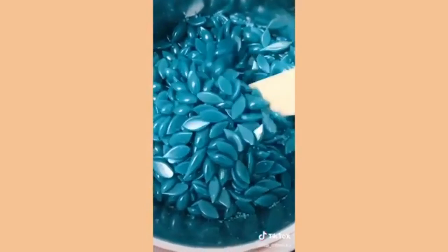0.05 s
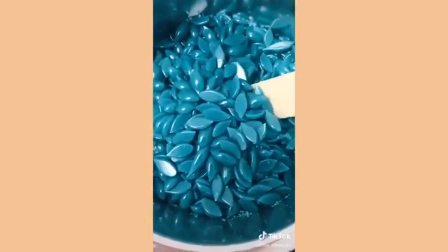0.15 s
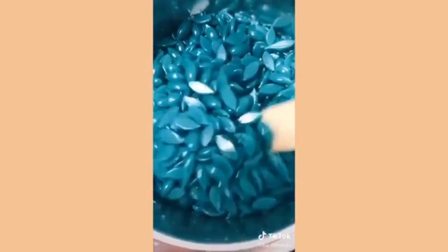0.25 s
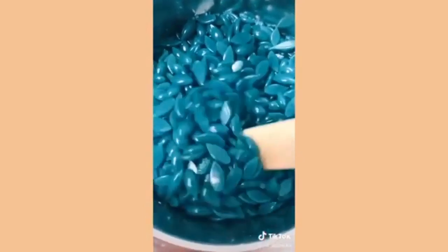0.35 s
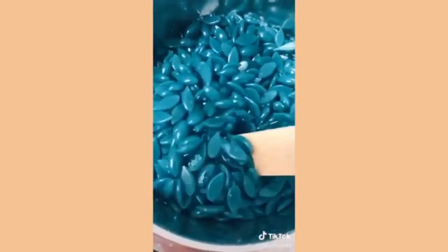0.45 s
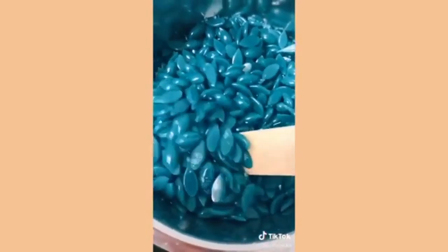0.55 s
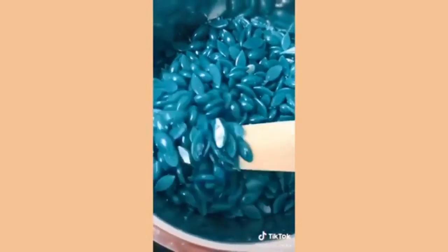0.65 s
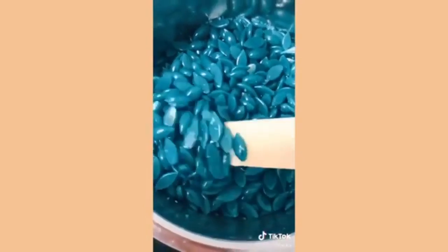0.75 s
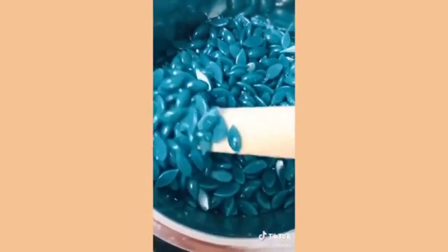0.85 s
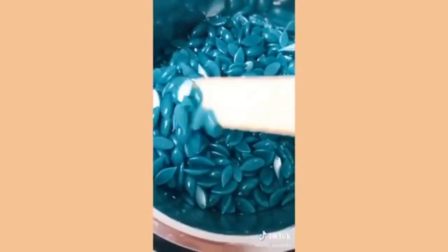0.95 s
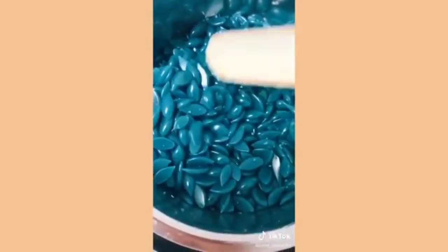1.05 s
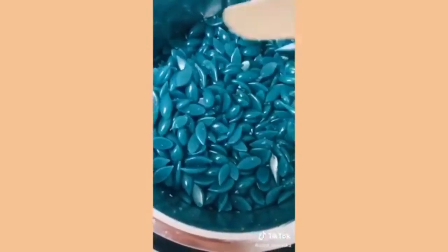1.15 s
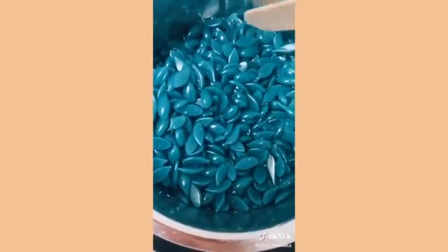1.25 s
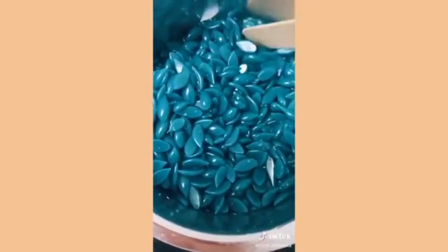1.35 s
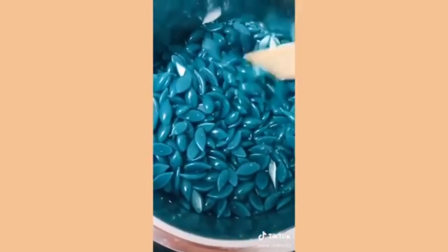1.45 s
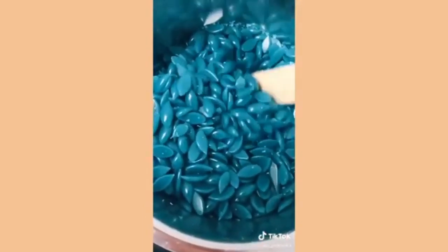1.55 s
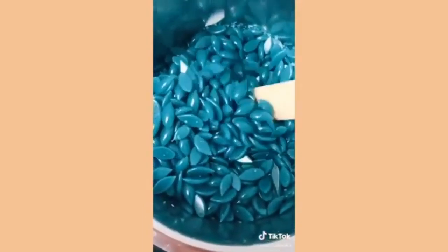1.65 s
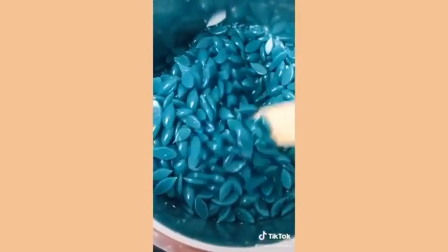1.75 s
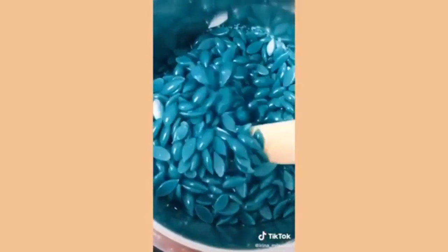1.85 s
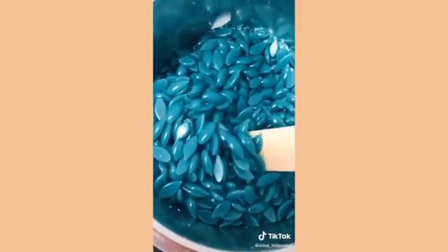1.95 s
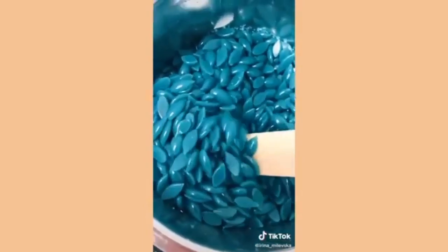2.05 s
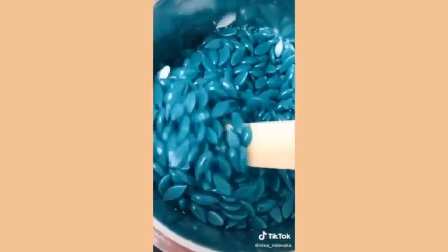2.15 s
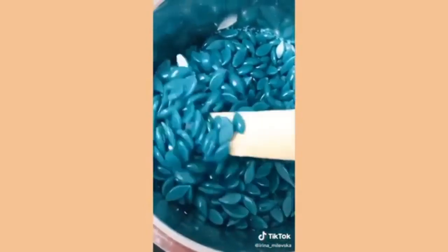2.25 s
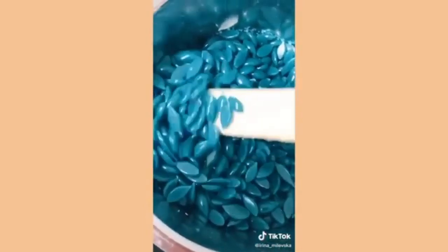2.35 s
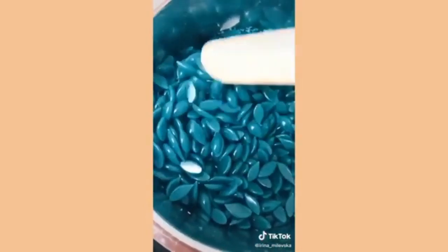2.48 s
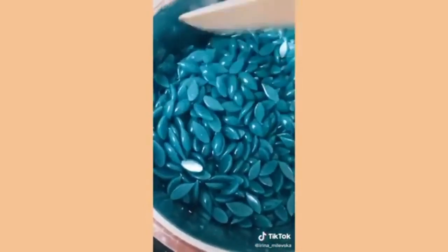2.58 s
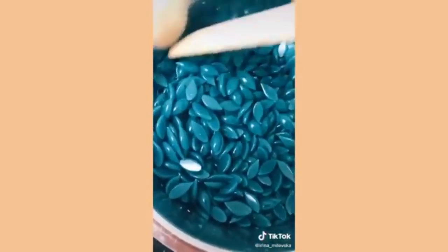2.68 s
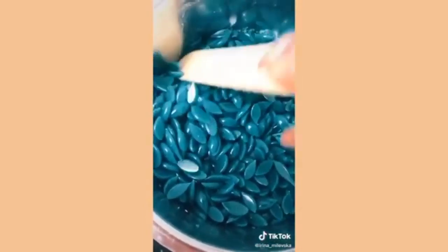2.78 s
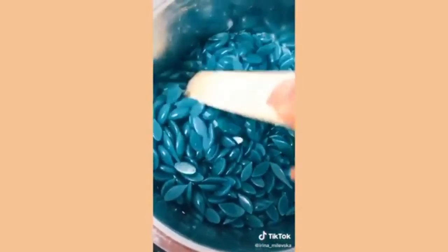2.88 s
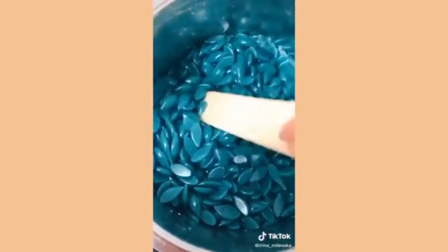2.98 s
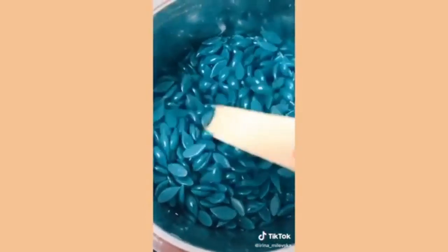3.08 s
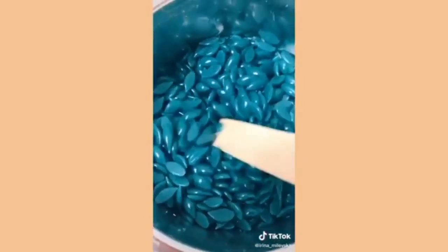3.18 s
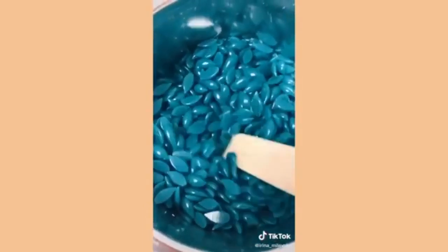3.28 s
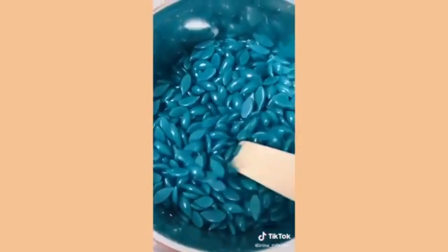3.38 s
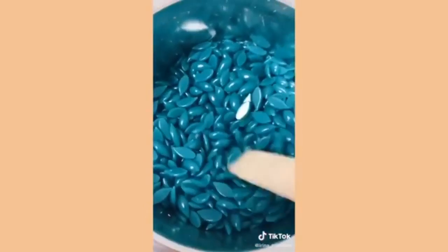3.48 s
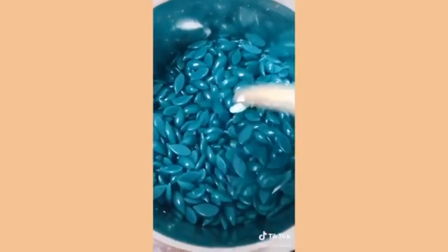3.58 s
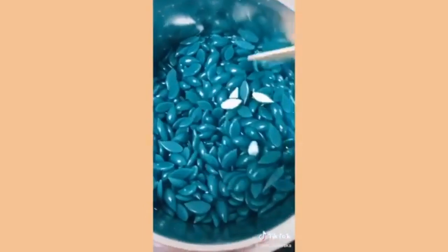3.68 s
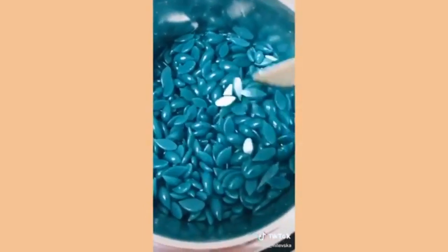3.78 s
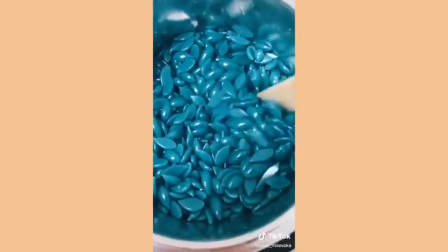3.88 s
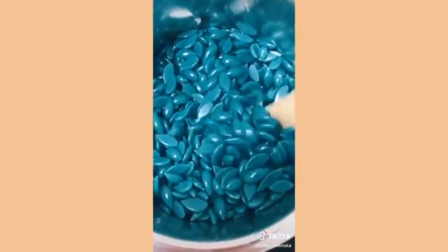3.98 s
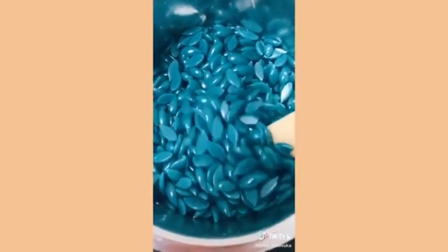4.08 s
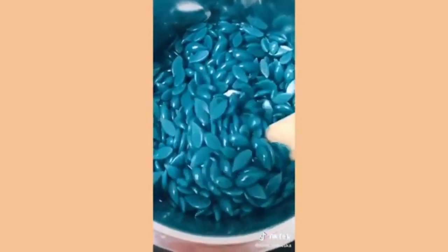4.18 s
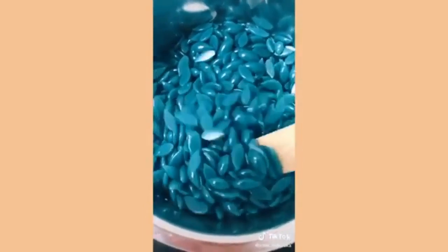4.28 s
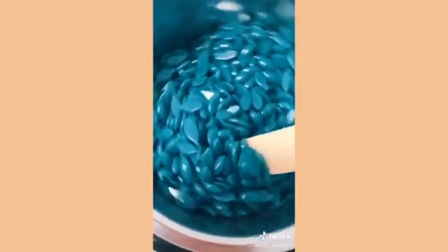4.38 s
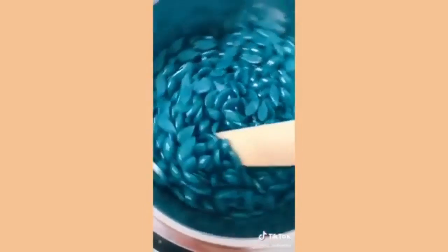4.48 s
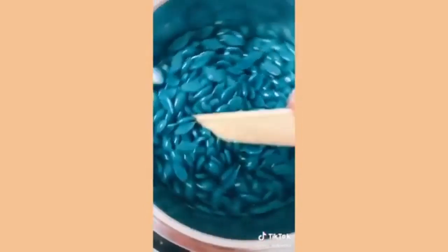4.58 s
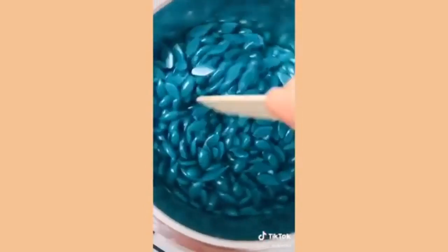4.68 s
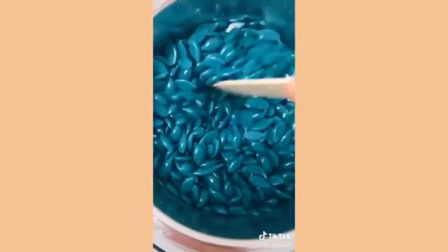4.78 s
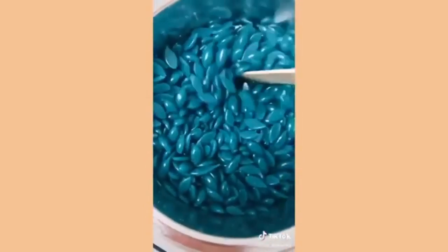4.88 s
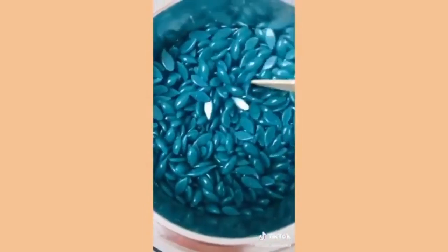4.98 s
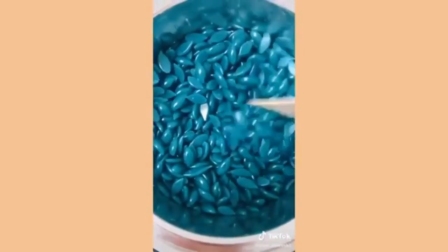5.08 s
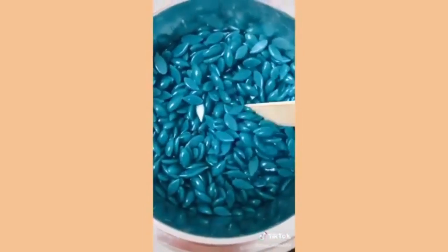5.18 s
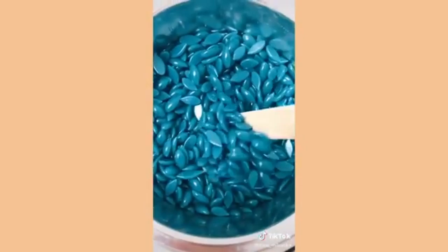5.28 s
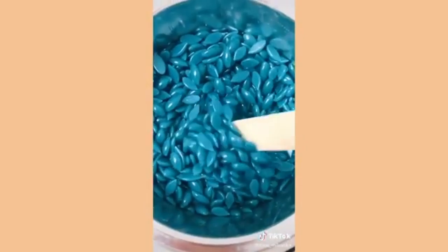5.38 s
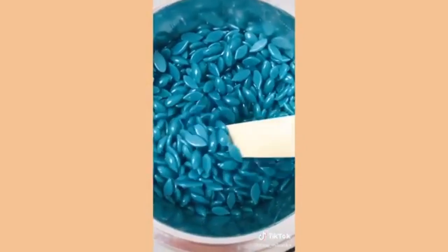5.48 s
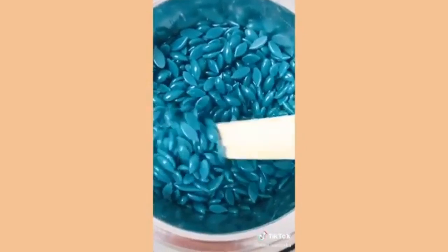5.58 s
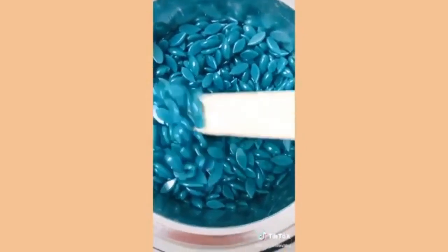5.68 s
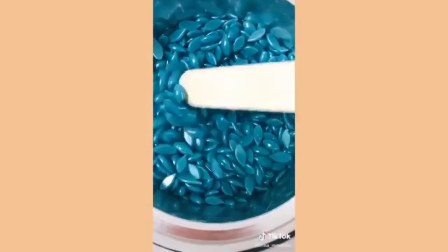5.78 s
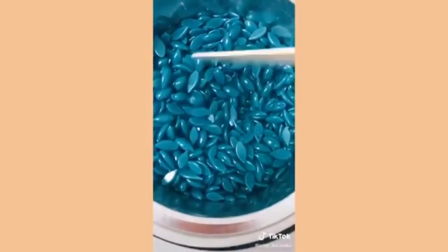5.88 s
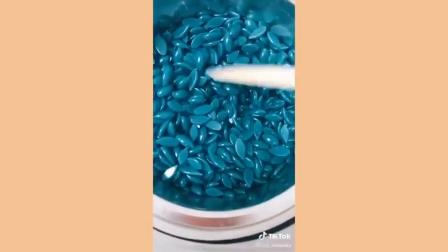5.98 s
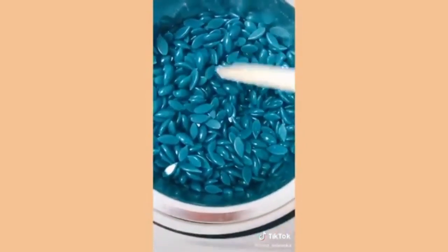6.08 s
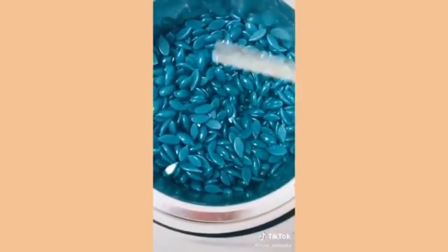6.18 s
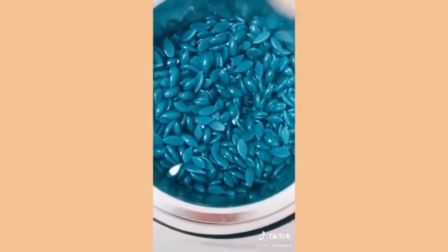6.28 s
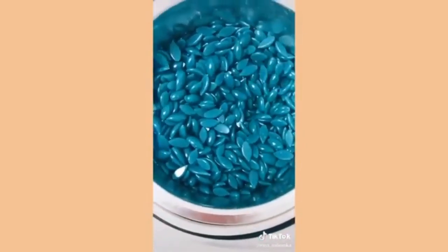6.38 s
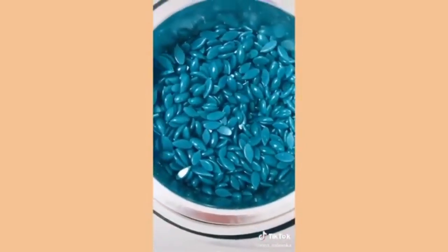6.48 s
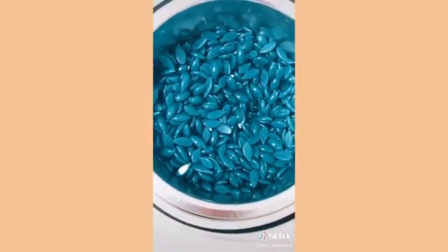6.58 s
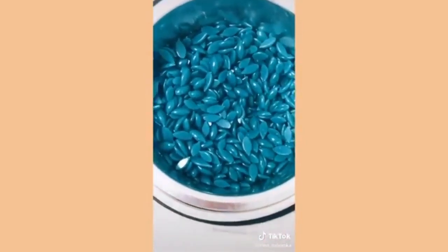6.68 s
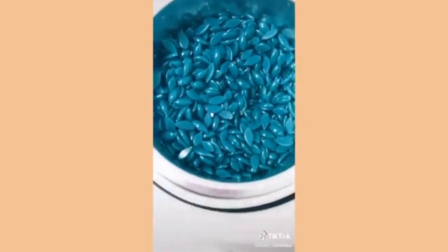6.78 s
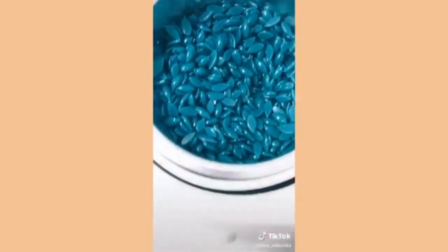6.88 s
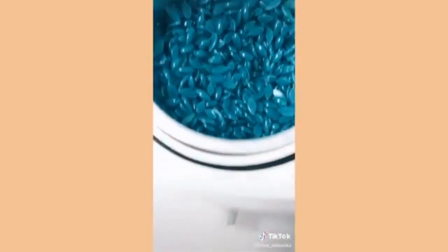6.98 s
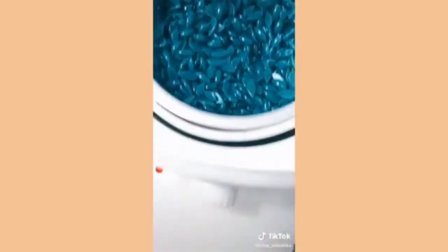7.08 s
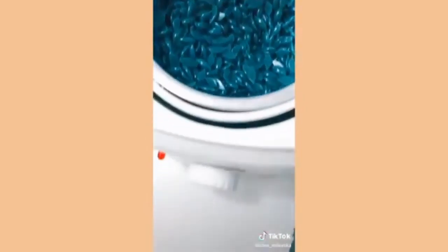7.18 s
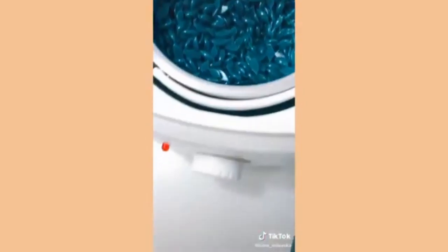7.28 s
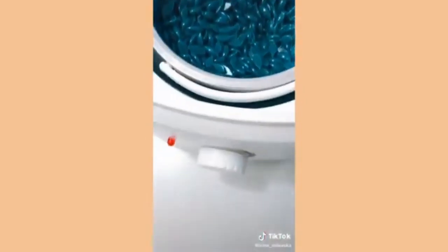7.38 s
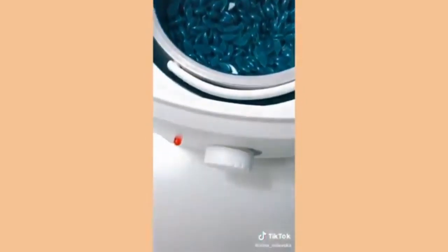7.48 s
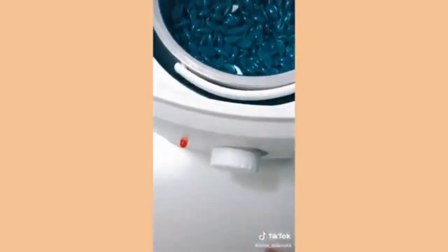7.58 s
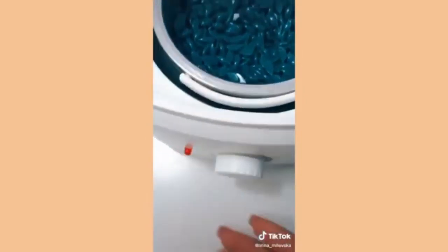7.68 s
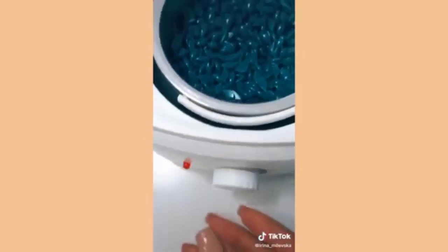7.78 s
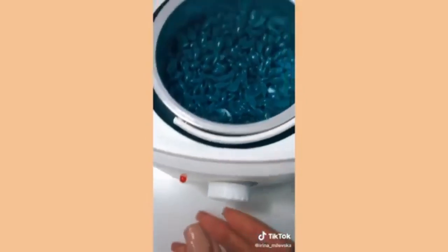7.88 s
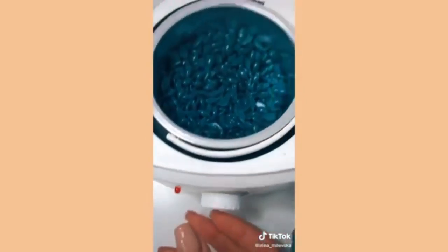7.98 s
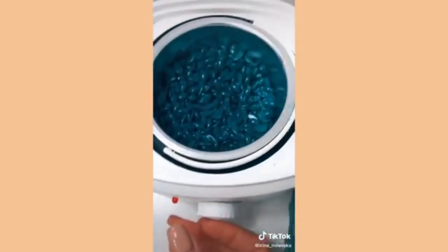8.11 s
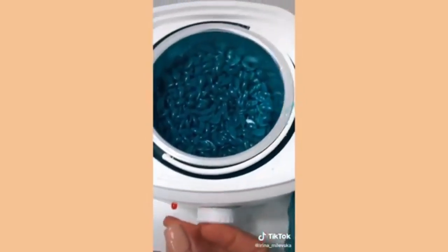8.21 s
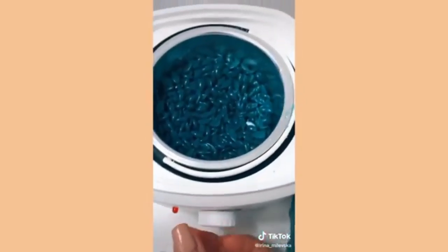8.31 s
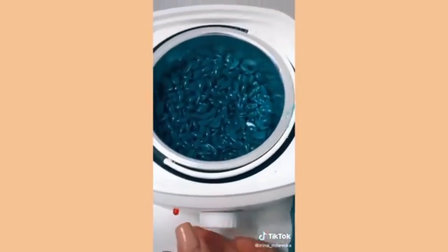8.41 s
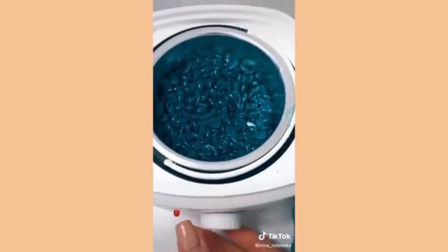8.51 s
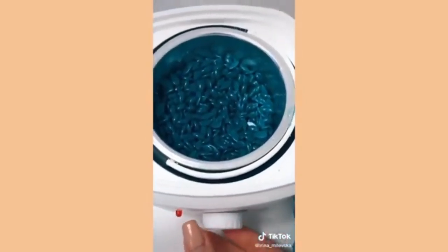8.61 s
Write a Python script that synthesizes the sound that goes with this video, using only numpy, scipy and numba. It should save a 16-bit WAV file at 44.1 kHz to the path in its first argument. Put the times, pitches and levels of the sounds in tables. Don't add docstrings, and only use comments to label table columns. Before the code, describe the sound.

Crisp swarms of hard beads rattle and tick as a wooden blade pushes through them, pausing briefly whenever it lifts. Sharp raps on the pot floor and one woody knock on the rim stand out. Then near silence with light rubbing, a sudden bright clatter of the dropped spatula, and sparse fingertip touches with dull handling rumble. Very close, dry, small indoor room with faint low hum and hiss.

```python
import sys
import numpy as np
from scipy import signal
from scipy.fft import rfft, irfft
from scipy.io import wavfile
from scipy.ndimage import uniform_filter1d
from numba import njit

SR = 44100
rng = np.random.default_rng(int(sys.argv[2]) if len(sys.argv) > 2 else 0)


def dump_mix(stems):
    frames = np.atleast_2d(stems).T
    limited = np.clip(frames, -1, 1)
    pcm = np.round(limited * 32767).astype(np.int16)
    wavfile.write(sys.argv[1], SR, pcm)


def decibels_to_gain(level_db):
    exponent = np.asarray(level_db, float) / 20
    return 10 ** exponent


N = 381465


@njit
def ring(start, hz, t60, size, n):
    out = np.zeros(n)
    for k in range(len(start)):
        fall = np.log(1000.) / (t60[k] * SR)
        turn = np.exp(2j * np.pi * hz[k] / SR - fall)
        phasor = size[k] + 0j
        for i in range(start[k], min(n, start[k] + int(6 / fall))):
            out[i] += phasor.imag
            phasor *= turn
    return out


def strike(s, db, modes, scatter_db):
    hz, spread_hz, mode_db, t60 = np.transpose(modes)
    chance = rng.standard_normal((len(s), 4, len(modes)))
    share = decibels_to_gain(mode_db) / np.sqrt(np.sum(decibels_to_gain(mode_db) ** 2))
    size = decibels_to_gain(db.reshape(len(s), -1) + scatter_db * chance[:, 0]) * share
    size = size * np.sign(chance[:, 1]) / np.sqrt(t60 * SR)
    pitch = np.clip(hz + spread_hz * chance[:, 2], 50, .45 * SR)
    decay_s = t60 * decibels_to_gain(0.55 * scatter_db * chance[:, 3])
    start = np.repeat(np.clip(s * SR, 0, N).astype(np.int64), len(modes))
    return ring(start, pitch.ravel(), decay_s.ravel(), size.ravel(), N)


def hits(s, body_db, length_ms, bodies, lead, count):
    late = (rng.random((len(s), count)) * (1 + lead) - lead) * (np.arange(count) > 0)
    fade_db = -11 * np.abs(late)
    fade_db = fade_db - 10 * np.log10(np.sum(decibels_to_gain(fade_db) ** 2, axis=1, keepdims=True))
    when = (s[:, None] + late * length_ms[:, None] / 1000).ravel()
    return sum(strike(when, (fade_db + db[:, None]).ravel(), body, 0.92) for db, body in zip(body_db, bodies))


def walk(rate):
    hold = int(SR / rate)
    steps = np.repeat(rng.standard_normal(N // hold + 1), hold)
    return uniform_filter1d(steps, hold // 2)[:N]


def swarm(end_s, count, tail_db, clump_db):
    s = np.sort(rng.random(count)) * end_s
    at = (s * SR).astype(int)
    strength = np.minimum(rng.exponential(size=count), 3.5)
    clump = np.clip(1.1 * walk(50)[at] + walk(250)[at], -4, 2.2)
    db = tail_db * strength + clump_db * clump
    return s, db - 10 * np.log10(np.sum(decibels_to_gain(db) ** 2) / (end_s * SR))


def surges(s, peak_s, db, swell_s, dying_s):
    since = s - peak_s[:, None]
    climb = -since / np.abs(swell_s)[:, None]
    fall = since / np.abs(dying_s)[:, None]
    return db[:, None] - 20 * np.where(since < 0, climb, fall)


def shape(x, points):
    hz, db = np.transpose(points)
    f = np.fft.rfftfreq(N, 1 / SR) + 1
    return irfft(rfft(x) * decibels_to_gain(np.interp(np.log(f), np.log(hz), db)), N)


def colour(points):
    x = shape(rng.standard_normal(N), points)
    return x / x.std()


# f/Hz, density/dB per Hz
FLOOR = [(15, -43), (25, -10), (122, -3.5), (169, -8.5), (204, -8), (445, -20), (537, -19), (8580, -36),
         (12500, -35.5), (15500, -43.5)]
FLOOR_DB = -65


def floor():
    return decibels_to_gain(FLOOR_DB + 1.2 * walk(2.7)) * colour(FLOOR)


ROOM_T60_S, ROOM_DB, ROOM_TOP_HZ = 0.1, -22.5, 5000


def room(x):
    t = np.arange(SR) / SR
    build_up = np.minimum(t / 0.017, 1)
    tail = rng.standard_normal(SR) * decibels_to_gain(-60 * t / ROOM_T60_S) * build_up
    tail = signal.lfilter(*signal.butter(1, [250, ROOM_TOP_HZ], "band", fs=SR), tail)
    return decibels_to_gain(ROOM_DB) * signal.fftconvolve(x, tail / np.sqrt(np.sum(tail ** 2)))[:N]


# lift t/s, back in t/s
LIFTS = [
    (-.12, 0.032),
    (.555, 0.61),
    (1.08, 1.35),
    (2.65, 2.765),
    (3.46, 3.525),
    (3.6, 3.726),
    (5.175, 5.22),
    (5.85, 6.05),
]
SETTLE_DB_PER_S, DIP_DB_PER_S = 200.5, 1100


def lifted(s):
    return sum(np.minimum(SETTLE_DB_PER_S * (s - a), DIP_DB_PER_S * (b - s)).clip(0) for a, b in LIFTS)


DRIFT_DB, DRIFT_PER_S = 2.5, 7


def drift(s, modes):
    at = (s * SR).astype(int)
    return DRIFT_DB * np.transpose([walk(DRIFT_PER_S)[at] for _ in modes])


# f/Hz, spread/Hz, level/dB, T60/s
HOLLOW = [(1086, 180, -3.5, 0.036), (1930, 390, -8.5, 0.0035), (2640, 200, -3, 0.025),
          (3560, 150, -5.5, 0.0091)]
RATTLE = [(4325, 470, -5, 0.02), (5710, 260, 0, 0.014), (6920, 500, -1.5, 0.006), (8870, 550, -2.5, 0.013)]
EDGE = [(11680, 770, 0.45, 0.011), (13370, 550, 0.5, 0.0066), (16000, 590, 2.1, 0.0043)]
# peak t/s, level/dB, swell/(s per 20 dB), dying/(s per 20 dB),
# depth in the pot level/dB, upper hollow tones rel level/dB
SHOVES = [(.05, -22.5, -1.5, 0.11, 0, 1), (0.271, -26, 0, 0.29, -0.5, 1), (.614, -32, -0.05, 0.67, -1, 0.2),
          (.903, -40.5, 1, 0.13, 0.5, -3), (1.212, -64, .2, .2, -4, -4), (1.39, -43, 0, 3, 1.5, -1.1),
          (1.492, -34, 0, 0.4, 2.5, -0.5), (1.805, -25.5, 0.13, 0.13, 3, 0.5), (2.05, -39, 1.1, 0, 3, -1),
          (2.28, -31, 0.1, 0.38, 2, 1), (2.459, -35.5, 0.5, -0.02, -1, .6), (2.52, -47, 2, 1.5, 0, -3.5),
          (2.79, -29.5, 0.04, 1.5, -2, 0.5), (3.556, -32.5, 0.24, 0.1, -1.5, 0.8),
          (3.727, -46, .03, .09, 8, -1.5), (3.83, -42, -2.1, 2.7, -4, .6), (4.083, -26, 0.43, 0.15, 0, 1),
          (4.27, -33, 6, 1.03, 2, -1), (4.633, -38, -0.3, 2.5, -0.5, 1.8),
          (4.774, -36, -0.3, -0.2, 4, -1.5), (4.879, -23.5, 0.12, 0.18, -3, 1.5),
          (5.158, -31, 0.1, 0.06, -2.5, .6), (5.293, -42, -3, 11, 4, -0.3), (5.72, -34, 0.05, 0, 0.5, 2)]
HOLLOW_SHARE, HOLLOW_DB, EDGE_SHARE, EDGE_DB = 0.62, -11, 0.72, -15.5
HOLLOW_SETTLE = 0.8
COLOUR_DB = 3.5


def beads():
    s, db = swarm(6.04, count=7500, tail_db=3.0, clump_db=1.47)
    own_db = COLOUR_DB * rng.standard_normal((len(s), 2)).T.clip(-3, 1.5)
    *shove, depth_db, upper_db = np.transpose(SHOVES)
    each_db = surges(s, *shove)
    shove_db, leader = each_db.max(axis=0), each_db.argmax(axis=0)
    rattle_db = shove_db - lifted(s)
    hollow_db = HOLLOW_SHARE * shove_db - HOLLOW_SETTLE * lifted(s) + HOLLOW_DB + depth_db[leader]
    upper = np.outer(upper_db[leader], np.arange(len(HOLLOW)) > 0)
    contact_db = (0.69 * db + hollow_db + 7 + own_db[0])[:, None]
    edge_db = db + EDGE_SHARE * rattle_db + EDGE_DB + 11.5 + own_db[1]
    out = strike(s, (db + rattle_db + 9)[:, None] + drift(s, RATTLE), RATTLE, 3.52)
    out += strike(s, contact_db + upper + drift(s, HOLLOW), HOLLOW, 3.8)
    return out + strike(s, edge_db, EDGE, 4.0)


# f/Hz, spread/Hz, level/dB, T60/s
HOUSING = [(148, 9.95, 0.5, 0.15), (190.2, 12, -1, 0.15), (300, 8.7, -5.5, 0.058), (385, 29, -12.5, 0.049),
           (100.1, 24, -12, 0.1)]
# peak t/s, level/dB, swell/(s per 20 dB), dying/(s per 20 dB)
PUSHES = [(0.05, -45.5, -3, 1.5), (.33, -44, -0.5, 0.6), (.55, -51.5, .3, 1.5), (1.39, -37.5, 0.38, 0.76),
          (1.836, -41, 0, 0.1), (2.19, -40, 0.45, 0.77), (2.84, -47, 0.2, 1.8), (3.36, -46, 1.5, 1.5),
          (3.78, -47, 1.3, 2), (4.09, -43.5, 1, 2), (4.27, -35.5, 0, 0.73), (4.4, -39.5, -1.5, 0.72),
          (4.5, -42, -3, 0.6), (5.17, -46.5, 0.4, 3.5)]


def housing():
    s, db = swarm(6.04, count=1100, tail_db=1.0, clump_db=1.3)
    push_db = surges(s, *np.transpose(PUSHES)).max(axis=0)
    return strike(s, db + push_db - 0.97 * lifted(s) + 9, HOUSING, 3.0)


# t/s, level/dB, brightness/dB, length/ms
THUDS = [(.137, -37.5, -10, 5.1), (1.19, -56, 1.5, 2.5), (1.341, -29, -12, 5.4), (1.37, -28.5, 2.5, 5.7),
         (1.401, -22, 5, 5.2), (1.487, -25, 6, 7.6), (1.499, -26.5, 4, 4.9), (2.937, -28, 4.5, 14),
         (1.671, -35, 4, 5.1), (2.098, -36, 0, 1.9), (2.191, -36.5, -1.5, 1.5), (2.201, -35, 0.5, 3),
         (3.002, -30, 9, 6.9), (3.776, -34, -1, 7.1), (3.804, -33.5, 3.5, 2.4), (3.863, -31.5, 7, 3.6),
         (3.951, -37, 8.5, 6.5), (4.051, -30.5, 7, 3.1), (4.068, -24.5, -1.5, 3.7),
         (4.191, -41.5, 4.5, 4.6), (4.615, -33, 9, 2.9), (5.131, -31.5, -7.5, 5), (5.146, -24, -2, 5),
         (5.156, -25, -1, 3.4), (5.168, -29, 4.5, 11.2)]
# t/s, level/dB, length/ms
CLACKS = [(.041, -18.5, 5.2), (.082, -23, 2.8), (.256, -20, 3.7), (.263, -20, 2.9), (.298, -19.5, 4.7),
          (.439, -30.5, 3.3), (.582, -29.5, 2.2), (.717, -22, 4.3), (.862, -35, 2.1), (1.457, -29, 3.7),
          (1.615, -28.5, 1.8), (2.455, -30.5, 4.1), (2.597, -26.5, 2.94), (2.861, -24, 2),
          (3.231, -29.5, 2.16), (3.351, -31, 2.1), (3.499, -34, 1.2), (4.523, -35, 3.1), (5.276, -31, 3.5),
          (5.281, -30, 5.3), (5.665, -28, 5)]
# t/s, level/dB, length/ms
TICKS = [(.759, -28.5, 1.96), (.91, -38, 5.1), (1.025, -37, 3), (1.275, -63, 1.9), (1.514, -23.5, 2.8),
         (1.547, -26, 7), (1.981, -32, 1.3), (2.424, -29.5, 4.8), (2.472, -27.5, 1.9), (2.745, -49.5, 3.3),
         (2.886, -28, 3.7), (2.905, -31.5, 3.2), (3.022, -25, 4.1), (3.03, -30, 2), (3.04, -27.5, 2.1),
         (3.084, -25.5, 1.7), (3.555, -27.5, 1.9), (4.182, -34, 2), (4.438, -32, 1.9), (4.595, -21, 1.94),
         (4.631, -27, 6), (4.971, -38, 4.7), (5.4, -31.5, 2.5), (5.7, -29.5, 3.2), (6.003, -55.5, 1.65)]
THUD_DB, CLACK_DB, TICK_DB = (0.5, -1, -3), (-19, -1, -9), (-19.5, -1.5, -0.5)


def clicks():
    out = 0
    for rows, (hollow_db, rattle_db, edge_db) in ((THUDS, THUD_DB), (CLACKS, CLACK_DB), (TICKS, TICK_DB)):
        s, db, *bright_db, length_ms = np.transpose(rows)
        bright = sum(bright_db)
        body_db = db + hollow_db, db + rattle_db + bright, db + edge_db + 1.1 * bright
        out = out + hits(s - .0004, body_db, .6 * length_ms, (HOLLOW, RATTLE, EDGE), lead=.7, count=7)
    return decibels_to_gain(38.5) * out


# t/s, level/dB, pot wall rel level/dB
BUMPS = [(0.043, -37.5, -12), (0.317, -36.5, -13), (0.415, -40, -20), (1.371, -33, -4), (1.485, -30, -4),
         (2.071, -31.5, -9.5), (2.159, -37, -16), (2.831, -37.5, -14), (3.0, -39.5, -15), (3.391, -38, -11),
         (3.725, -37.5, 4), (4.067, -33.5, -14), (4.195, -53, -22), (4.263, -28.5, -21),
         (4.376, -26.5, -28), (4.462, -36.5, -13), (5.16, -35, -16), (5.577, -37.5, -21)]
# f/Hz, spread/Hz, level/dB, T60/s
WALL = [(450, 70, 0, 0.04), (601.5, 70, -1.5, .02)]
BUMP_DB = 36


def bumps():
    s, db, wall_db = np.transpose(BUMPS)
    return strike(s, db + BUMP_DB, HOUSING, 1.5) + strike(s, db + wall_db + BUMP_DB - 6.0, WALL, 1.5)


# t/s, level/dB, pot hollow rel level/dB
DULL_SNAPS = [(0.05, -20, -14), (0.069, -16, -15), (0.073, -16, -13), (0.214, -31, -2), (0.263, -9.5, -13),
              (0.313, -18, -8.5), (0.318, -16.5, -9), (0.398, -30, -1), (0.447, -24.5, -13),
              (0.545, -24, -17), (0.608, -21, -14), (0.727, -23, -6), (0.9, -24, -8), (1.345, -26.5, 5),
              (1.587, -27, -15), (1.636, -32, -4), (1.683, -28, -6.5), (1.701, -23, -5), (1.742, -35, -5),
              (1.793, -16, -9), (1.84, -23, -7), (2.04, -27.5, -13.5), (2.057, -27, -5), (2.355, -25, -15),
              (2.383, -22, -13), (2.636, -22.5, -19), (2.651, -34, -16), (2.774, -21, -15),
              (2.964, -17.5, -12), (3.134, -27.5, -14), (3.16, -25, -2), (3.294, -20.5, -6),
              (3.476, -32, -14), (3.536, -29.5, -15), (4.08, -15.5, -5), (4.257, -30, -9), (4.45, -27, -2),
              (4.551, -32, -7), (4.868, -18, -12), (4.911, -14.5, -7), (5.098, -37, -5), (5.25, -31, -16),
              (5.3, -26.5, -9), (5.411, -24.5, -1.5), (5.42, -25, -16), (5.538, -27.5, 1),
              (5.552, -25.5, -7), (5.602, -33, 0), (5.647, -25.5, -12), (5.651, -24, -10), (5.758, -23, -9),
              (5.772, -22, -5.5), (5.808, -22, -15)]
SHARP_SNAPS = [(0.137, -32.5, 5.5), (0.491, -30, -12), (0.76, -16, -22), (1.066, -33, -2), (1.109, -40, 2),
               (1.209, -44, -3), (1.22, -44, 3), (1.3, -48, -13), (1.354, -29, -1), (1.402, -8.5, -7),
               (1.443, -27.5, -17.5), (1.536, -21.5, -4), (1.754, -33, -7), (1.789, -19.5, -5),
               (1.802, -16, -5), (1.879, -28, 6.5), (2.121, -31, -8), (2.345, -27.5, -13),
               (2.472, -15.5, -20), (2.554, -33, -5), (2.557, -37, -3), (2.785, -14.5, -9.5),
               (2.807, -19, -14.5), (2.957, -18.5, -4), (3.009, -17.5, -10), (3.041, -17, -26),
               (3.072, -26, -16.5), (3.109, -27.5, -15), (3.251, -20.5, -9), (3.26, -21.5, -12),
               (3.347, -21.5, -10), (3.381, -28.5, -6), (3.429, -28.5, -15), (3.445, -29.5, -14),
               (3.652, -34.5, -2), (3.657, -36.5, 3.5), (3.669, -37, 4), (3.686, -41, 7), (3.884, -22, -11),
               (3.93, -21.5, -10), (4.089, -17.5, -1.5), (4.15, -28, -5), (4.386, -25.5, -6),
               (4.472, -29, -8), (4.581, -28.5, -14), (4.657, -27, -12), (4.702, -31.5, -9.5),
               (4.765, -23, -8), (4.83, -23.5, -5.5), (4.853, -16, -9), (4.864, -15, -9.5),
               (4.915, -16, -16), (4.919, -20.5, -19), (5.016, -27.5, -9)]
STRAY_SNAPS = [
    (.184, -32, -2.5),
    (.22, -26.5, -12),
    (4.65, -25, -10),
    (5.053, -27, -13),
    (5.588, -31, 4.5),
    (5.933, -39, 3),
    (5.948, -42, 3),
]
SNAP_DB, SNAP_MS, DULL_EDGE_DB, SHARP_EDGE_DB = 27.5, 1.1, -8.5, 1
SNAP_RING = 0.46


def snaps():
    out = 0
    bodies = [np.array(body) * [1, 1, 1, SNAP_RING] for body in (HOLLOW, RATTLE, EDGE)]
    kinds = (DULL_SNAPS, DULL_EDGE_DB), (SHARP_SNAPS, SHARP_EDGE_DB), (STRAY_SNAPS, SHARP_EDGE_DB)
    for rows, edge_db in kinds:
        s, db, hollow_db = np.transpose(rows)
        body_db = db + hollow_db, db, db + edge_db
        out = out + hits(s - .0006, body_db, SNAP_MS + 0 * s, bodies, lead=.3, count=3)
    return decibels_to_gain(SNAP_DB) * out


# t/s, level/dB
RAPS = [
    (1.403, -20),
    (1.487, -15.5),
    (1.5, -15.5),
    (2.201, -26.5),
    (5.131, -21),
    (5.146, -20),
    (5.155, -14.5),
]
# f/Hz, spread/Hz, level/dB, T60/s
POT_FLOOR = [(1013, 30, 1, .016), (1270, 40, -3, .012)]
# t/s, level/dB
FLICKS = [(4.068, -20), (4.182, -25.5), (5.25, -31), (5.35, -27), (5.377, -31), (5.381, -29), (5.385, -27),
          (5.389, -27), (5.399, -19.5), (5.47, -25), (5.482, -22.5)]


def blade():
    upper = np.array(HOLLOW[2:]) * [1, 1, 1, SNAP_RING]
    out = 0
    for rows, body in ((RAPS, POT_FLOOR), (FLICKS, upper)):
        s, db = np.transpose(rows)
        out = out + hits(s - .001, [db], 1.5 + 0 * s, [body], lead=0.22, count=2)
    return decibels_to_gain(SNAP_DB) * out


# t/s, level/dB
KNOCK = (3.7233, 13.3)
# f/Hz, spread/Hz, level/dB, T60/s
SPATULA = [(897, 0.97, -12, 0.021), (1836, 0.9, -7, .008), (2250, 0.99, 3.5, 0.0069),
           (2710, 0.9, 0.5, 0.0076), (3130, 0.99, -4, 0.0087), (4280, 0.99, -7.5, 0.011),
           (5310, 0.94, -15.5, 0.0074), (7305, 0.99, -15.5, 0.0054), (12500, 0.96, -9, 0.0036)]


def knock():
    return strike(np.array(KNOCK[:1]), np.array(KNOCK[1:]) + 11, SPATULA, 0.0997)


# t/s, level/dB, brightness rel level/dB
BRUSH = [
    [(6.19, -100, 9.5), (6.21, -84, 15.5), (6.255, -80.5, 19), (6.32, -85, 15), (6.405, -93, 15),
     (6.45, -82.5, 11.5), (6.52, -93.5, 10), (6.57, -88.5, 12.5), (6.62, -99, 10)],
    [(6.7, -87, 0), (6.88, -78.5, 2), (6.898, -61, -23.5), (6.96, -58, -18), (7.02, -75, -2)],
    [(7.38, -90, -17.5), (7.442, -63.5, -3), (7.5, -61.5, -2), (7.56, -70.5, -7), (7.69, -70.5, -4.5)],
    [(8.05, -93, 5), (8.068, -64, -13), (8.12, -75, -13), (8.2, -76, -16.5), (8.235, -71.5, -17),
     (8.29, -75, -16.5), (8.33, -80, -18), (8.42, -83.5, -17)],
]
BRUSHED_HZ = [(5200, 7060, 9100, 14000), (750, 1250, 1950), (550, 1500, 3500),
              (950, 1570, 2201, 2700, 3500, 4500)]
BRUSHED_DB, BRUSHED_Q = (-3, 3.5, -1.5, 5.5), (9.8, 9, 8, 20)


def brush():
    t, out = np.arange(N) / SR, 0
    dull = colour([(300, -26), (800, 1.0), (3000, -3.0), (5000, -11.5), (9000, -29.0)])
    bright = colour([(2500, -35.5), (5000, -0.5), (9500, -3), (10500, -9), (13000, -5.5), (16000, -7.5)])
    for stroke, tones_hz, tone_db, q in zip(BRUSH, BRUSHED_HZ, BRUSHED_DB, BRUSHED_Q):
        s, db, bright_db = np.transpose(stroke)
        gain = decibels_to_gain(np.interp(t, s, db, -120, -120) + 2.2 * walk(55))
        hiss = gain * (dull + decibels_to_gain(np.interp(t, s, bright_db)) * bright)
        tones = sum(signal.lfilter(*signal.iirpeak(hz, q, SR), hiss) for hz in tones_hz)
        out = out + hiss + decibels_to_gain(tone_db) * tones
    return out


# low edge f/Hz, high edge f/Hz, rel level/dB, T60/s
RING_OUT = [(500, 2700, -20.5, 0.43), (3357, 6400, -25, 0.42), (7500, 32000, -28, 0.36)]


def ring_out(s, body_db):
    out = 0
    for db, (low_hz, high_hz, rel_db, t60) in zip(body_db, RING_OUT):
        power = np.bincount((s * SR).astype(int), decibels_to_gain(db + rel_db) ** 2, N)
        power = signal.lfilter([1], [1, -decibels_to_gain(-120 / (t60 * SR))], power)
        noise = colour([(0.5 * low_hz, -20), (low_hz, 0), (high_hz, -4), (1.4 * high_hz, -24)])
        out = out + np.sqrt(uniform_filter1d(power, size=150, origin=70).clip(0)) * noise
    return out


# f/Hz, spread/Hz, level/dB, T60/s
ROCKING = [(355, 6.8, -1.5, .2), (1168, 60, -3.5, .06), (2020, 30, -1.5, .04), (2815, 50, -9.5, .04),
           (4910, 150, -10.5, .03), (5796, 55, -7, .04)]
WOBBLE_S, WOBBLE_DB, WOBBLE_DB_PER_S = (7.04, 7.36), -5, 80


def wobble(count=40):
    s = WOBBLE_S[0] + (WOBBLE_S[1] - WOBBLE_S[0]) * rng.random(count)
    return strike(s, WOBBLE_DB - WOBBLE_DB_PER_S * (s - WOBBLE_S[0]), ROCKING, 3.0)


# t/s, level/dB, fingernail rel level/dB
TOUCHES = [(6.25, -68.5, 19), (6.888, -30, -31.5), (6.94, -53, -26), (6.967, -44, -6.5), (7.008, -67, 9),
           (7.644, -49.5, -6), (7.697, -31, 4), (8.07, -44, -18), (8.231, -53.5, -17), (8.34, -57, -7.5),
           (8.359, -53.5, -9), (8.574, -32.5, -3)]
# t/s, level/dB, flat-side thump rel level/dB
BOUNCES = [(7.026, -27.5, -2.5), (7.031, -17.5, -12.5), (7.0333, -9.5, -24), (7.046, -34.5, 2.5),
           (7.069, -38.5, -5), (7.111, -32, -0.5), (7.134, -23.5, -6.5), (7.14, -26, -9.5),
           (7.157, -30.5, -8.5), (7.171, -35, -1.5), (7.194, -43.5, 0), (7.21, -48, -3.5)]
# f/Hz, spread/Hz, level/dB, T60/s
TABLE_LOW = [(386, 53, -10, 0.055), (788, 99, -4.5, .014), (1283, 310, -1, 0.0044), (2070, 200, -1, 0.0094),
             (3125, 250, -1.5, 0.0043)]
TABLE_MID = [(4260, 750, -7.5, 0.006), (5500, 400, -1.5, 0.012), (6840, 260, -3, 0.0023)]
TABLE_TOP = [(8850, 390, -1, 0.0077)] + EDGE
DROPPED = [(370, 8, -12.5, .2), (1140, 40, -13.5, .12), (2060, 20, 0, 0.045), (2820, 30, -3.5, .03),
           (3620, 40, -2, .025), (5845, 60, 0.5, 0.06), (9200, 120, 0, .05)]
BOUNCE_TOP_DB, TOUCH_TOP_DB, BOUNCE_MS, TOUCH_MS, FIRM_DB = 5.5, -19.5, 3.8, 3.7, -45


def table():
    s, db, thump_db = np.transpose(BOUNCES)
    touch_s, touch_db, nail_db = np.transpose(TOUCHES)
    soft = np.clip(decibels_to_gain(FIRM_DB - touch_db - nail_db.clip(0)), 1, 6)
    when = np.r_[s, touch_s]
    length_ms = np.r_[BOUNCE_MS * decibels_to_gain(-.2 * (db + 25)), TOUCH_MS * soft]
    bounce_db = np.array([db + thump_db, db, db + BOUNCE_TOP_DB])
    finger_db = touch_db + np.array([0 * nail_db, nail_db, nail_db + TOUCH_TOP_DB])
    body_db = np.hstack([bounce_db, finger_db])
    taps = hits(when, body_db, length_ms, (TABLE_LOW, TABLE_MID, TABLE_TOP), lead=.05, count=16)
    dropped = strike(s, 0.65 * db + 21, DROPPED, 2.0)
    return decibels_to_gain(31.5) * taps + ring_out(when, body_db) + dropped + wobble()


# t/s, housing hum level/dB, deep sway rel level/dB
SWAY = [
    (7.02, -74.5, -4.5),
    (7.04, -59, -15.5),
    (7.15, -55.5, -14.5),
    (7.35, -68, 2),
    (7.69, -67.5, 3.5),
    (7.71, -53, -17),
    (7.9, -67.5, -4.5),
    (8.565, -74.5, 3),
    (8.584, -49, -20.5),
    (8.65, -62.5, -15.5),
]


def sway():
    s, db, deep_db = np.transpose(SWAY)
    t = np.arange(N) / SR
    hum = colour([(70, -26.0), (120, -2), (190, 3.5), (350, -9.0), (600, -36.5)])
    deep = colour([(20, -7), (45, 5.0), (90, 0), (130, -35.5)])
    return decibels_to_gain(np.interp(t, s, db, -120)) * (hum + decibels_to_gain(np.interp(t, s, deep_db)) * deep)


def scene():
    small = signal.butter(4, 745, "high", fs=SR, output="sos")
    near = signal.sosfilt(small, beads() + clicks() + knock()) + housing()
    single = signal.sosfilt(small, snaps() + blade()) + bumps()
    pot = near + room(near) + single + room(single)
    return (floor() + pot + brush() + table() + sway())[None]


def low_pass(x):
    return signal.sosfilt(signal.butter(12, 16480, fs=SR, output="sos"), x)


# f/Hz, level/dB
BAND = [(20, -18), (50, -3), (80, 0), (14900, 0), (15150, -28), (16450, -36), (16600, -80)]


def record(dry):
    rounded = np.tanh(dry / .95) * .95
    mix = shape(rounded, BAND)
    return low_pass(mix)


dry = scene()
out = record(dry)
dump_mix(out)
```